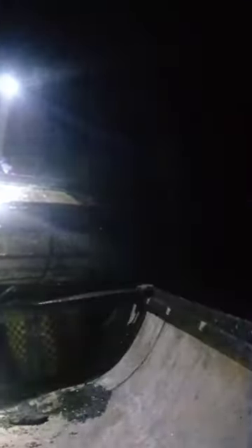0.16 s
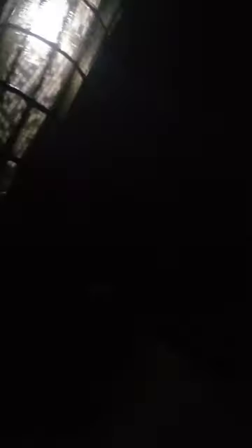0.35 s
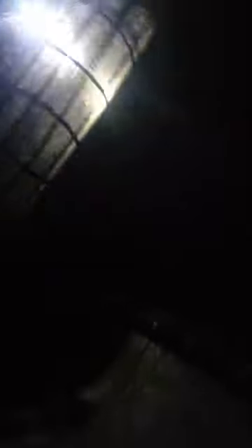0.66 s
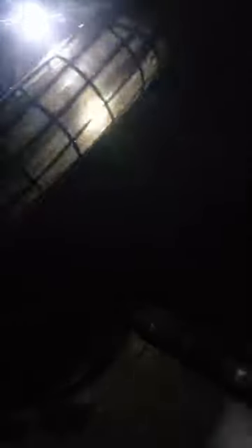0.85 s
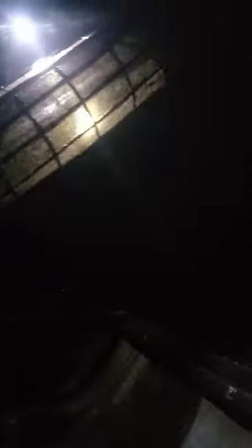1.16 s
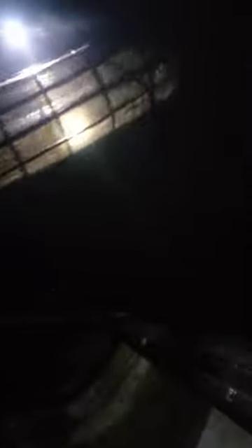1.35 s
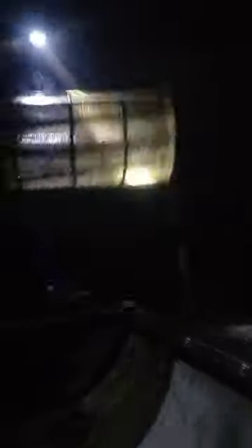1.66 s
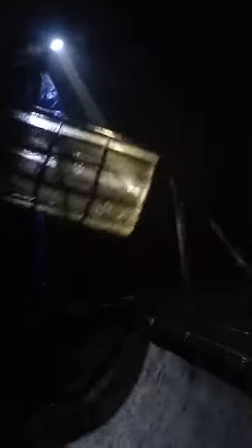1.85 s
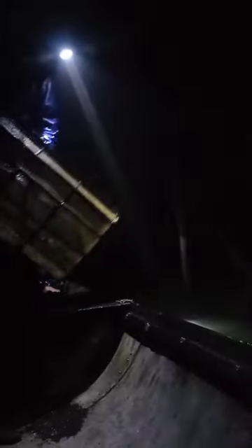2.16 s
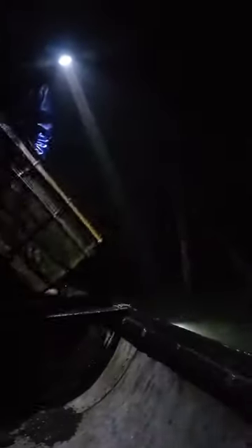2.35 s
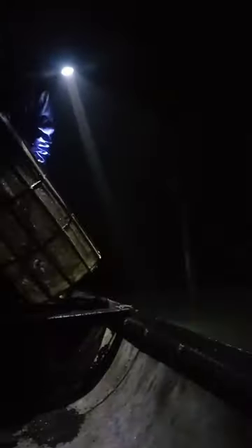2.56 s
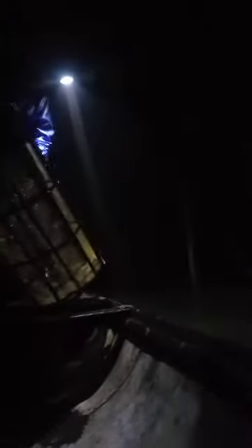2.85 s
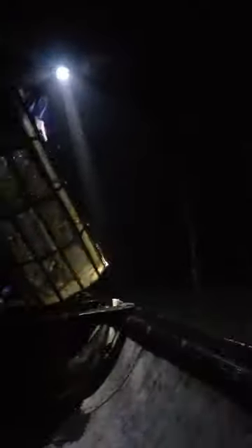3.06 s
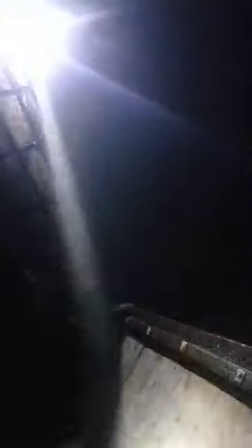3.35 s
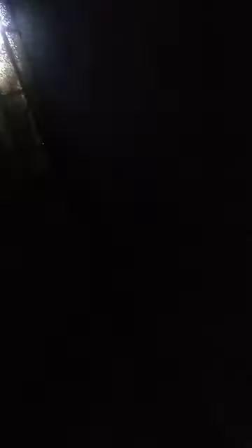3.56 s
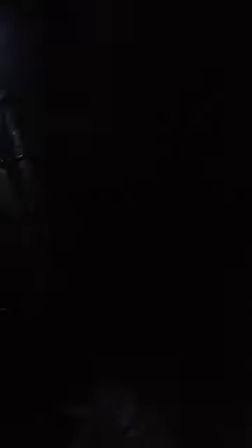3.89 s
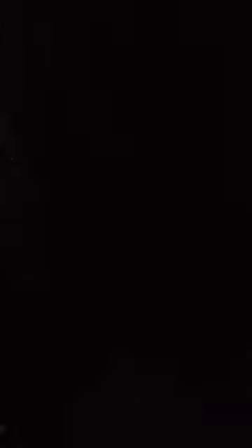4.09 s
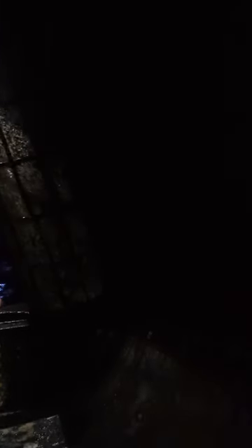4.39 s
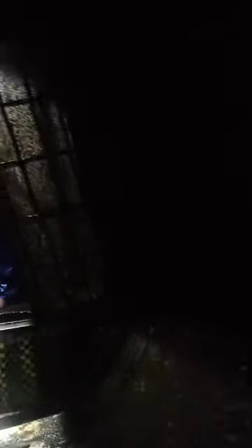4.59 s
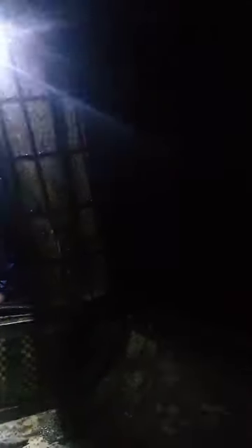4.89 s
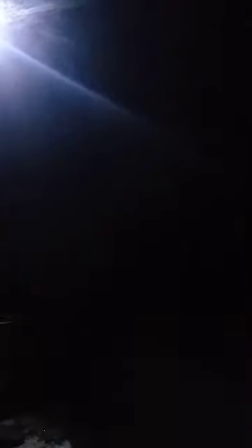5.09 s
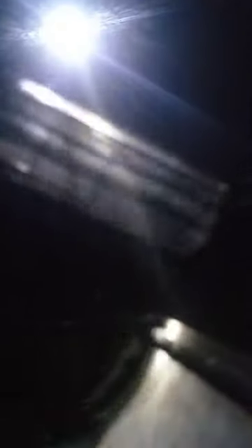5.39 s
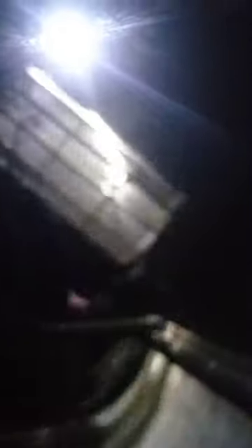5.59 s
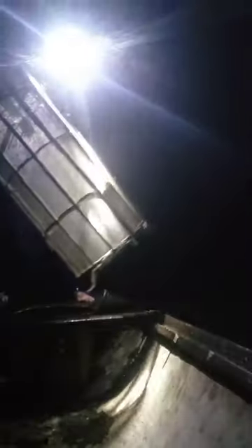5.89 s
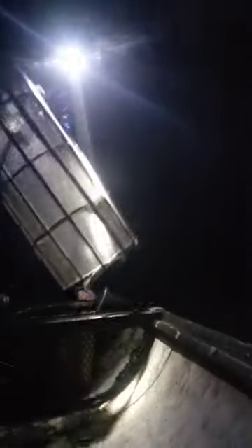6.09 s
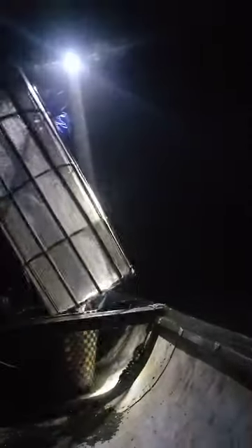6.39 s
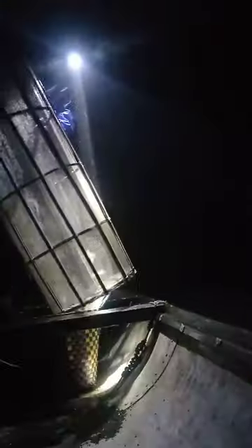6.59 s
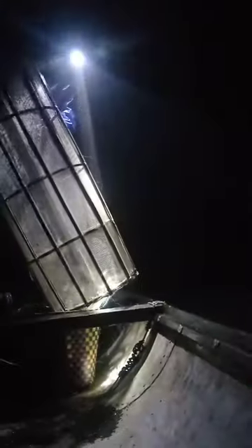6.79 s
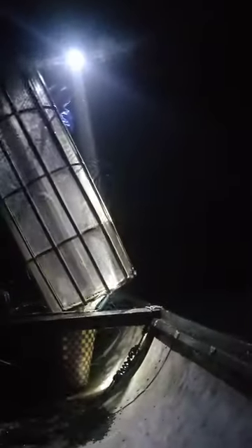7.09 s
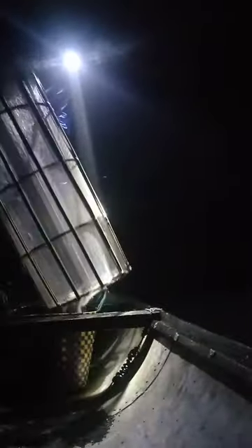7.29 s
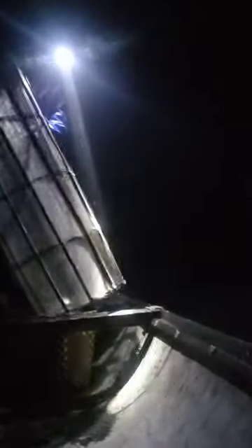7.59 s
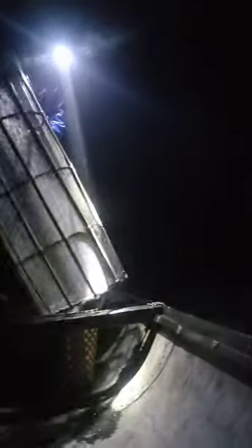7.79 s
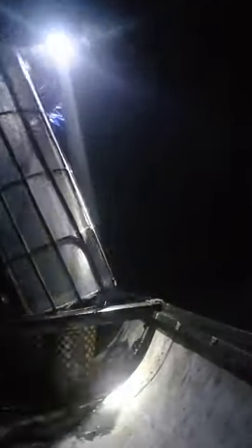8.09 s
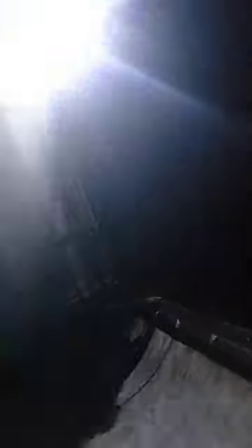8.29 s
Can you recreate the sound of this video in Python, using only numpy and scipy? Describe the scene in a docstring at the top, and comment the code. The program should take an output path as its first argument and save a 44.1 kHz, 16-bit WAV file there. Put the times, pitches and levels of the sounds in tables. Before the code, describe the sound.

Close, small-microphone sound outdoors in a small boat on quiet water. A low hull rumble runs under wet mesh rustle, fine spray and ticking drops. A sharp snap comes early, then strong hollow knocks before three seconds, another heavy one near five, and finally a crowded flurry of knocks, scraping and a burst of shaken net.

```python
"""A wet net trap is handled over the side of a small boat at night. From the start the hull rumbles softly
(shaped noise) while the netting rustles and sheds spray and ticks (noisy grains and ringing drops).
Soft knocks and a snap come early: blows ring the hull modes, hard contacts ring the light frame. Harder knocks
follow. A faint narrow-band hum enters after five seconds, and from about six and a half the frame is knocked
and dragged over the hull in a dense flurry, with the net shaken hardest at its beginning."""
import sys
import numpy as np
from scipy import signal
from scipy.io import wavfile

SR = 44100
rng = np.random.default_rng(int(sys.argv[2]) if len(sys.argv) > 2 else 0)


def file_out(sig):
    """Save sig as 16-bit WAV at sys.argv[1]."""
    # one column per channel
    cols = np.atleast_2d(sig).T
    # limit, then scale
    lim = np.clip(cols, -1, 1)
    pcm = np.round(lim * 32767).astype(np.int16)
    wavfile.write(sys.argv[1], SR, pcm)


N = 372644
STRIKE_SPREAD_DB = 3    # blows land unevenly on the modes
LOUDEST_GRAIN_DB = 17


def from_db(db):
    """Decibels to a linear gain."""
    return 10 ** (np.asarray(db) / 20)


def rms_one(x):
    """Scale a signal to rms 1."""
    return x / np.sqrt(np.mean(x ** 2) + 1e-20)


def sieve(x, order, hz, kind="low"):
    """Butterworth filter: low, high or band."""
    return signal.sosfilt(signal.butter(order, hz, kind, fs=SR, output="sos"), x)


def in_time(rows):
    """Columns of a curve table at every sample."""
    s, *columns = np.transpose(rows)
    return [np.interp(np.arange(N) / SR, s, column) for column in columns]


def at_hz(points, hz):
    """A spectrum read on a log-frequency axis."""
    point_hz, values = np.array(points).T
    return np.interp(np.log(hz), np.log(point_hz), values)


def clicks(times, sizes):
    """One impulse for each event."""
    out = np.full(N, 1e-18)
    np.add.at(out, (np.asarray(times) * SR).astype(int), sizes)
    return out


def ring(x, hz, t60):
    """A two-pole resonator: a unit click sets a decaying sine of height 1 ringing."""
    r, w = from_db(-60 / (t60 * SR)), 2 * np.pi * hz / SR
    return signal.lfilter([0, np.sin(w)], [1, -2 * r * np.cos(w), r * r], x)


def swell_and_die(x, rise_s, t60):
    """Each click becomes a gain that rises with a time constant and then decays."""
    rise, fall = np.exp(-1 / (rise_s * SR)), from_db(-60 / (t60 * SR))
    return signal.lfilter([1 - rise], np.convolve([1, -rise], [1, -fall]), x)


def bands(source, low_hz, high_hz):
    """Half-octave slices with their centres; neighbours take unrelated rows of the source."""
    edges = low_hz * 2 ** np.arange(0, np.log2(high_hz / low_hz), .5)
    for k, low in enumerate(edges):
        yield low * 2 ** (1 / 4), sieve(source[k % 2], 2, [low, low * np.sqrt(2)], "band")


def flicker(rate):
    """Slow random wander of rms 1 at every 20th sample."""
    r = np.exp(-40 * np.pi * rate / SR)
    noise = rng.standard_normal(N // 20 + 2002)
    return rms_one(signal.lfilter([1], [1, -2 * r, r * r], noise)[2000:])


def grains(per_s, spread_db, smooth):
    """Two rows of random clicks of uneven size at shared moments, over a share of smooth noise."""
    born = rng.random(N) < per_s / SR
    sizes = born * from_db(np.minimum(spread_db * rng.exponential(1, N), LOUDEST_GRAIN_DB))
    puffs = signal.lfilter([1], [1, -.96], sizes)    # each grain is a puff that dies within milliseconds
    return (rms_one(puffs) + smooth) * rng.standard_normal((2, N))


def coloured(source, spectrum, low_hz, high_hz, patchy_db, rate):
    """A source shaped band by band, each band flickering partly with the others; rms 1."""
    together, out = flicker(rate), 0
    for hz, band in bands(source, low_hz, high_hz):
        gain = from_db(at_hz(spectrum, hz) + patchy_db * (0.69 * together + flicker(rate)))
        out = out + np.interp(np.arange(N) / 20, np.arange(len(gain)), gain) * band
    return rms_one(out)


def pings(per_s, spectrum, low_hz, high_hz, turns, count):
    """Random clicks dealt to resonators spread in pitch, each ringing for some cycles; rms 1."""
    sizes = (rng.random(N) < per_s / SR) * from_db(4.9 * np.minimum(rng.exponential(1, N), 4))
    dealt = rng.integers(0, count, N)
    out = 0
    for k, hz in enumerate(np.geomspace(low_hz, high_hz, count)):
        drops = sizes * (dealt == k) + 1e-18
        rung = ring(ring(drops, hz, turns / hz), hz, turns / hz)
        out = out + from_db(at_hz(spectrum, hz)) * hz ** 2 * rung    # hz squared offsets the shorter high rings
    return rms_one(out)


# Spectrum of the hull rumble. Each row: frequency in Hz, relative level in dB per Hz.
RUMBLE_SPECTRUM = [(15, -61), (25, -50), (64, 0), (141, 8), (271, 0.5), (299, -5), (348, -8.5),
                   (500, -11.5), (650, -59), (1100, -120)]


def rumble_texture():
    """Lumpy low noise of the hull on the water; rms 1."""
    return coloured(rng.standard_normal((2, N)), RUMBLE_SPECTRUM, 21.78, 500, patchy_db=2.5, rate=13.0)


# Spectrum of the dragged frame. Each row: frequency in Hz, relative level in dB per Hz.
DRAG_SPECTRUM = [(71, -32), (120, -2), (141, -3), (352, -3), (457, -11), (593, -5), (787, -21),
                 (892, -13.5), (1800, -26), (2340, -57), (3960, -120)]


def drag_texture():
    """The frame stutters over the planks: sparse noisy grains with short woody pings among them."""
    scrape = coloured(grains(120, spread_db=5.5, smooth=2.5), DRAG_SPECTRUM, 130.6, 1900, patchy_db=-2.5, rate=15)
    return 0.55 * scrape + .6 * pings(1100, DRAG_SPECTRUM, 231.5, 1667, turns=14.0, count=16)


# Changing background shaking of the hull by water, feet and the dragged frame.
# Each row: time in seconds, rumble level in dB, drag level in dB.
SHAKING = [(0.0, -49, -63), (2.2, -51, -61.5), (2.4, -48, -54), (3.5, -48, -54), (4.6, -48.5, -52),
           (5.8, -50, -52), (6.4, -50.5, -53), (6.68, -41, -45.5), (6.85, -43, -25.5), (7.0, -50, -31),
           (7.4, -53, -38.5), (7.55, -47, -42.5), (8.1, -50, -41.5), (8.45, -57, -43.5)]
SHUDDER_RUMBLE_DB, SHUDDER_DRAG_DB = -9.5, -25    # relative to the boom of the blow


def hull_noise():
    """Rumble and drag follow the background shaking, and both swell again in the shudder after each blow."""
    rumble_db, drag_db = in_time(SHAKING)
    rumble, drag, after = rumble_texture(), drag_texture(), shudder()
    boom = sieve(rumble, 2, 105, "high")
    rattle = sieve(drag, 4, 600)
    background = from_db(rumble_db) * rumble + from_db(drag_db) * drag
    return background + after * (from_db(SHUDDER_RUMBLE_DB) * boom + from_db(SHUDDER_DRAG_DB) * rattle)


# Spectrum of the coarse rustle. Each row: frequency in Hz, relative level in dB per Hz.
RUSTLE_SPECTRUM = [(500, 4.5), (900, -1), (1400, -1), (2300, -2.5), (3200, -8.5), (4500, -20.5), (8000, -9)]


def rustle_texture():
    """Coarse crackle of wet mesh: dense grains with ringing drops among them."""
    crackle = coloured(grains(630, spread_db=4.0, smooth=1.0), RUSTLE_SPECTRUM, 524, 7000, patchy_db=3.5, rate=11)
    return 0.45 * crackle + .4 * pings(3000, RUSTLE_SPECTRUM, 804, 5016, turns=43, count=18)


# Spectrum of the fine spray. Each row: frequency in Hz, relative level in dB per Hz.
SPRAY_SPECTRUM = [(1800, 4), (3000, 7), (5000, 7.5), (6500, 11), (9000, 4.5), (12000, 4), (16000, -8)]


def spray_texture():
    """Fine spray: uneven bright grains with small high drops ringing among them."""
    hiss = coloured(grains(420, spread_db=8.0, smooth=2.16), SPRAY_SPECTRUM, 2012, 16000, patchy_db=2.5, rate=32)
    return 0.92 * hiss + .6 * pings(1500, SPRAY_SPECTRUM, 2764, 9560, turns=50, count=14)


# Changing background rustle and spray of the netting.
# Each row: time in seconds, coarse rustle level in dB, fine spray level in dB.
NET_BACKGROUND = [(0.0, -61.5, -64.5), (0.23, -65, -63), (0.26, -76, -79.5), (0.9, -65.5, -89),
                  (1.3, -56.5, -77), (1.5, -49.5, -60.5), (1.78, -62, -60.5), (1.82, -58, -80),
                  (3.4, -77, -76.5), (3.8, -69, -84), (5.19, -65, -80), (5.24, -57.5, -55.5),
                  (5.7, -57, -57.5), (5.85, -76, -59.5), (6.33, -55, -52.5), (6.82, -38.5, -42),
                  (6.97, -49, -48), (7.5, -53, -56), (8.45, -59, -60)]


def net():
    """Rustle and spray follow their changing background plus the flicks and brushes of the mesh."""
    rustle_gain, spray_gain = from_db(in_time(NET_BACKGROUND)) + flicks() + brushes()
    spray = spray_texture()
    dull = sieve(spray, 6, 9300)
    brightness = np.clip(from_db(54.5) * spray_gain, 0, 1)    # fainter spray is duller above 9.3 kHz
    spray = dull + brightness * (spray - dull)
    return rustle_gain * rustle_texture() + spray_gain * spray


# Ticks and slaps of drops and knots. Each row: start in seconds, level in dB, pitch in Hz.
DROP_TICKS = [(0.0785, -51, 6100), (0.5507, -43.5, 4500), (0.7896, -29.5, 2190), (1.5, -33.5, 2880),
              (1.627, -33, 2470), (1.8515, -39, 2680), (2.288, -50.5, 9100), (2.329, -52, 9100),
              (2.388, -49.5, 3000), (2.624, -56, 2660), (2.783, -52.5, 7140), (2.818, -40.5, 6660),
              (3.1518, -40.5, 4130), (3.407, -53, 9000), (3.882, -51, 3430), (4.5431, -48.5, 6940),
              (4.853, -40, 2440), (5.035, -51, 8960), (5.86, -43.5, 4570), (5.9055, -37.5, 8150),
              (5.957, -36, 6550), (6.1805, -38, 2600), (6.4662, -36, 4730), (6.6188, -31.5, 2940),
              (6.678, -32, 4840), (7.0594, -37, 5870), (7.238, -45, 6740), (7.2734, -34.5, 3040),
              (7.334, -34, 7000), (7.4663, -33.5, 8340), (7.573, -33.5, 6900), (7.66, -36.5, 2850),
              (7.897, -37, 1500), (8.114, -41, 6600)]
TICK_T60_S = 0.045


def ticks():
    """A noisy ping at its own pitch on top of a broad crack, sudden and dying."""
    out, age = np.zeros(N), np.arange(int(.12 * SR)) / SR
    for start, level_db, hz in DROP_TICKS:
        puff = rng.standard_normal(len(age)) * from_db(-60 * age / TICK_T60_S)
        ping = ring(puff, hz, 8.1 / hz)
        tick = ping / np.abs(ping).max() + 0.014 * puff
        at = int(start * SR)
        out[at:at + len(age)] += from_db(level_db) * tick[:N - at]
    return sieve(out, 1, [1500, 9000], "band")


# Blows of the trap frame on the hull. Each row: start in seconds, blow strength in dB, thud pitch in Hz,
# hull ringing relative to the blow in dB, hardness in dB.
BLOWS = [(0.328, -37, 151, -9, -13), (0.545, -36.5, 313, -11.5, -6), (1.098, -47, 600, -7, 14),
         (1.135, -44.5, 700, -11.5, 11), (2.095, -44.5, 490, -10.5, -2), (2.365, -41, 151, -18, -2),
         (2.408, -33, 151, -10.5, 5), (2.602, -13, 390, -12.5, 1), (2.639, -16, 174, -17, 10.5),
         (2.665, -13.5, 493, -12, -4.5), (2.672, -18.5, 304, -14.5, -6), (2.697, -11, 250, -34, -14),
         (3.032, -10.5, 385, -15, -2), (3.069, -21, 410, -16, 7), (3.093, -17.5, 205, -24.5, 6),
         (3.215, -42, 153, -6.5, 15), (3.599, -35, 760, -11.5, 16), (3.835, -25.5, 190, -11.5, -8.5),
         (4.847, -7, 552, -9.5, 6.5), (4.873, -17, 262, -20.5, -20.5), (4.894, -15.5, 151, -18.5, -14.5),
         (5.065, -35, 696, -7.5, -1), (5.418, -32.5, 282, -11.5, -3), (5.554, -25, 290, -13.5, 5),
         (5.627, -27.5, 290, -24, -15), (5.788, -29, 182, -20.5, -13), (6.017, -38.5, 312, -14, 24.5),
         (6.466, -12.5, 305, -12.5, -0.5), (6.519, -17.5, 250, -16.5, 7), (6.618, -18, 316, -16.5, 10),
         (6.681, -19, 624, -12, 6.5), (6.703, -16.5, 332, -22, 13), (6.74, -19, 500, -14, 5),
         (6.753, -5, 326, -17, 9.5), (6.789, -23.5, 284, -5.5, 2), (6.823, -14.5, 300, -10.5, 1),
         (6.858, -12, 360, -19, 1), (6.943, -18, 202, -15.5, -8), (7.08, -23, 258, -7, 7.5),
         (7.156, -22, 642, -15.5, 21), (7.196, -12.5, 340, -22, 10), (7.243, -27.5, 330, -10.5, 4),
         (7.287, -14, 323, -12.5, 4.5), (7.411, -13, 353, -28, 10), (7.446, -25, 340, -12, 3),
         (7.491, -20, 326, -20, 15), (7.66, -17, 403, -7.5, 1), (7.67, -7, 171, -14.5, -3.5),
         (7.687, -7.5, 175, -19, -11), (7.755, -23, 169, -12.5, -13), (7.937, -23.5, 570, -20, 8),
         (8.16, -8, 463, -14, 10.5), (8.171, -18, 310, -6, 1.5), (8.195, -11.5, 284, -6.5, 0),
         (8.216, -8.5, 171, -18.5, -17.5), (8.429, -19, 335, -15.5, -6)]
THUD_DB, THUD_CYCLES = -7.0, 1.4    # level beside the blow; cycles to the top of an average thud
THUD_SHORTER, THUD_SAG = 0.22, 0.03    # dB shorter per dB of strength; pitch sag per cycle at the start


def thuds():
    """Each blow is a short dull sine that swells for a cycle or two, sags in pitch and dies."""
    out, age = np.zeros(N), np.arange(int(.1 * SR)) / SR
    mean_db = np.mean([row[1] for row in BLOWS])
    for start, level_db, hz, _, _ in BLOWS:
        turns = age * hz / THUD_CYCLES * from_db(THUD_SHORTER * (level_db - mean_db))
        envelope = (turns * np.exp(1 - turns)) ** 2
        tone = np.sin(2 * np.pi * np.log1p(THUD_SAG * hz * age) / THUD_SAG)
        at = int(start * SR)
        out[at:at + len(age)] += (from_db(level_db + THUD_DB) * envelope * tone)[:N - at]
    return out


BOOM_DB, EDGE_DB = -6, -6    # low and high ringing beside the middle


def blow_clicks(hz, extra_db=0):
    """Impulses with which the blows drive the hull at one pitch; a harder blow trades boom for edge."""
    s, strength_db, _, body_db, hard_db = np.transpose(BLOWS)
    boom_db, edge_db = body_db + BOOM_DB - hard_db, body_db + EDGE_DB + hard_db
    low, high = at_hz([(170, 1), (260, 0.048)], hz), at_hz([(550, 0), (900, 1.0)], hz)
    ringing_db = low * boom_db + (1.5 - low - high) * body_db + high * edge_db
    return clicks(s, from_db(strength_db + ringing_db + extra_db))


# Ringing modes of the hollow hull. Each row: pitch in Hz, relative level in dB, longest t60 in seconds.
HULL_MODES = [(151, 3, 1), (244, -13, 0.14), (357, -2.5, 0.38), (452.7, 0, 0.25), (493.5, -2, 0.81),
              (590, -4.5, 0.43), (660, -6.5, 0.84), (747, -16, 1), (817, -34, 0.26), (930, -20.5, 0.74)]
WET_TURNS = 80    # the water damps a mode within so many cycles


def hull_ringing():
    """Every blow sets the hull modes ringing, each a little unevenly."""
    out = 0
    for hz, level_db, t60 in HULL_MODES:
        uneven_db = STRIKE_SPREAD_DB * rng.standard_normal(len(BLOWS))
        out = out + ring(blow_clicks(hz, level_db + uneven_db), hz, min(t60, WET_TURNS / hz))
    return sieve(out, 2, [90, 1800], "band")    # wet wood meets wet wood: no hard click


# Dense blur of lesser hull modes. Each row: frequency in Hz, relative level in dB per Hz.
BLUR_SPECTRUM = [(60, -26), (90, -29.5), (166, -0.5), (474, -2.5), (900, -5.5), (1500, -34), (2500, -48),
                 (4000, -69)]
# How long that blur lasts. Each row: frequency in Hz, t60 in seconds.
BLUR_DECAY = [(80, 0.19), (250, 0.29), (600, 0.16), (1500, 0.042), (4000, .04)]


def hull_blur():
    """Crowded lesser modes are noise bands opened by each blow, mostly dying faster towards the top."""
    out = 0
    for hz, band in bands(rng.standard_normal((2, N)), 75.8, 3500):
        fall = from_db(-60 / (at_hz(BLUR_DECAY, hz) * SR))
        fade = signal.lfilter([1], [1, -fall], blow_clicks(hz))
        rise = np.exp(-hz / (.6 * SR))    # a band needs about a cycle to build up
        fade = signal.lfilter([(1 - rise) ** 2], [1, -2 * rise, rise ** 2], fade)
        out = out + from_db(at_hz(BLUR_SPECTRUM, hz) + 22) * fade * band
    return out


def knocks():
    """The frame knocks on the hull: thud, ringing modes and blur together."""
    return sieve(thuds() + hull_ringing() + hull_blur(), 3, 75, "high")


def shudder():
    """Gain of the shaking of the whole hull that swells after each blow and dies away."""
    s, strength_db, _, body_db, hard_db = np.transpose(BLOWS)
    return swell_and_die(clicks(s, from_db(strength_db + body_db - hard_db)), rise_s=0.02, t60=0.39)


# Sudden flicks of the wet mesh. Each row: start in seconds, coarse level in dB, fine level in dB.
MESH_FLICKS = [(0.549, -45.5, -52), (0.789, -33, -55), (0.925, -64, -89), (1.138, -61, -58),
               (1.495, -52, -55), (1.622, -41, -58), (1.732, -50, -61.5), (1.852, -43, -60),
               (1.881, -44.5, -52), (2.383, -55, -80), (2.409, -44.5, -84), (2.62, -58, -53.5),
               (2.817, -64, -52.5), (3.145, -56, -57.5), (3.68, -54, -56), (4.338, -77, -64),
               (4.848, -64, -63), (4.96, -62, -67), (7.565, -83, -73), (7.66, -46, -41), (7.934, -54, -86)]


def flicks():
    """Gains of rustle and spray that jump up at each flick and die away."""
    s, *levels_db = np.transpose(MESH_FLICKS)
    return np.array([swell_and_die(clicks(s, from_db(db)), rise_s=0.0026, t60=0.11) for db in levels_db])


# Hard snaps of the frame. Each row: start in seconds, level in dB.
FRAME_SNAPS = [(0.742, -44), (0.79, -20.5), (0.794, -23), (6.618, -26)]
# What the frame rings with. Each row: pitch in Hz, relative level in dB, free t60 in seconds.
FRAME_MODES = [(1180, 6, 0.2), (1500, 18.5, 0.038), (3230, -32, 0.062), (3430, -21, 0.084),
               (3920, -26, 0.076)]
SNAP_T60_SHARE = 0.23    # share of the free t60 that is heard


def snaps():
    """Hard short contacts ring the light frame and crack broadly."""
    s, snap_db = np.transpose(FRAME_SNAPS)
    rings = 0
    for hz, level_db, t60 in FRAME_MODES:
        uneven_db = STRIKE_SPREAD_DB * rng.standard_normal(len(s))
        struck = clicks(s, from_db(snap_db + level_db - 20.5 + uneven_db))
        rings = rings + ring(struck, hz, SNAP_T60_SHARE * t60)
    fade = signal.lfilter([1], [1, -np.exp(-1 / (0.0027 * SR))], clicks(s, from_db(snap_db - 11.5)))
    return rings + fade * sieve(rng.standard_normal(N), 2, [600, 5000], "band")


# Brushes of the mesh that swell and fade.
# Each row: middle in seconds, length in seconds, coarse level in dB, fine level in dB.
MESH_BRUSHES = [(1.016, 0.11, -60.5, -62), (1.628, 0.23, -44, -56), (2.513, 0.089, -49, -64),
                (2.954, 0.14, -49, -58.5), (3.277, 0.13, -65, -73), (3.493, 0.15, -44.5, -58),
                (3.782, 0.17, -57.5, -69), (3.996, 0.2, -72.5, -57), (4.112, 0.077, -59, -69),
                (4.435, 0.23, -73, -67), (4.721, 0.2, -49.5, -56.5), (8.217, 0.22, -70, -64)]
BRUSH_BLUNTNESS = 2.1    # small = flat top with steep ends


def brushes():
    """Gains of rustle and spray that swell and fade as a power of half a sine."""
    gain = np.zeros((2, N))
    for middle, length, *level_db in MESH_BRUSHES:
        a, b = int((middle - length / 2) * SR), int((middle + length / 2) * SR)
        swell = np.sin(np.linspace(0, np.pi, b - a)).clip(0) ** BRUSH_BLUNTNESS
        gain[:, a:b] += from_db(level_db)[:, None] * swell
    return gain


# Faint hum while the trap is held over the side. Each row: time in seconds, level in dB.
HUM_LEVEL = [(5.2, -67), (6.42, -58), (6.7, -55), (7.7, -54)]
# Its two close bands. Each row: centre in Hz, width of one resonator in Hz, relative level in dB.
HUM_TONES = [(555, 30, 0), (645, 30, -1)]


def hum():
    """Noise through two paired resonators, fading in and out within 0.1 s at the ends."""
    out = 0
    for hz, width_hz, level_db in HUM_TONES:
        t60 = np.log(1000) / (np.pi * width_hz)
        out = out + from_db(level_db) * rms_one(ring(ring(rng.standard_normal(N), hz, t60), hz, t60))
    before, after = (HUM_LEVEL[0][0] - .1, -90), (HUM_LEVEL[-1][0] + .1, -90)
    level_db, = in_time([before, *HUM_LEVEL, after])
    return from_db(level_db) * out


def scene():
    """Hull, net and small contacts in the open air."""
    return (hull_noise() + net() + ticks() + knocks() + snaps() + hum())[None]


# Colour of the small microphone. Each row: frequency in Hz, gain in dB.
MICROPHONE_COLOUR = [(8800, 2), (10000, -6), (13000, -5.5), (14200, -7), (14900, 10), (16000, -11)]
CUTOFF_HZ = 15800


def record(dry):
    """The small microphone dips above 9 kHz and peaks again near 15 kHz; the top is cut steeply."""
    hz = np.linspace(0, SR / 2, 65)
    colour = signal.firwin2(65, hz, from_db(at_hz(MICROPHONE_COLOUR, hz + 1)), fs=SR)
    heard = signal.fftconvolve(dry, colour[None], mode="same")
    return signal.sosfilt(signal.ellip(12, .5, 60, CUTOFF_HZ, fs=SR, output="sos"), heard)


dry = scene()
out = record(dry)
file_out(out)
```